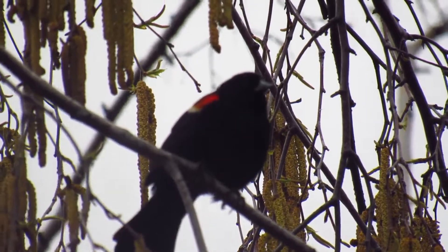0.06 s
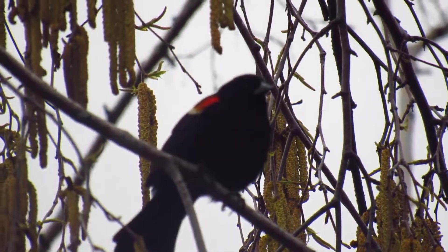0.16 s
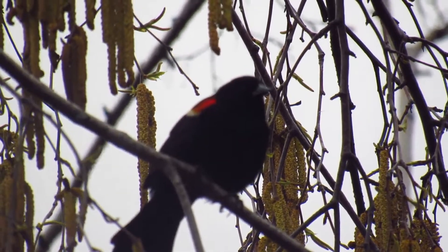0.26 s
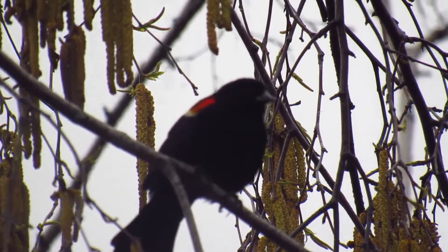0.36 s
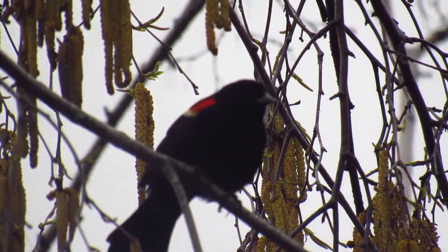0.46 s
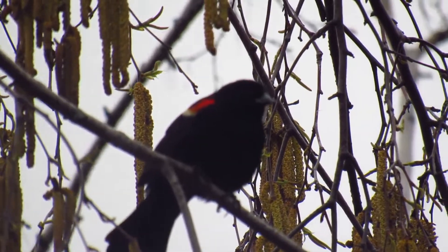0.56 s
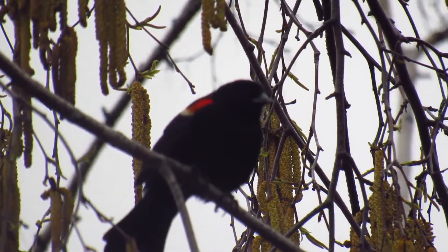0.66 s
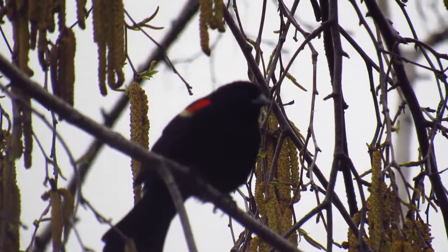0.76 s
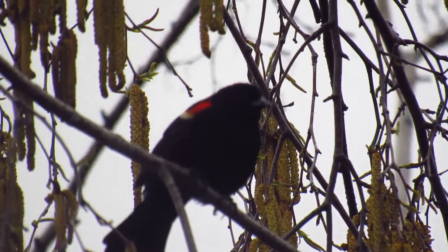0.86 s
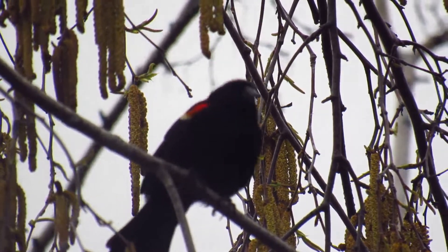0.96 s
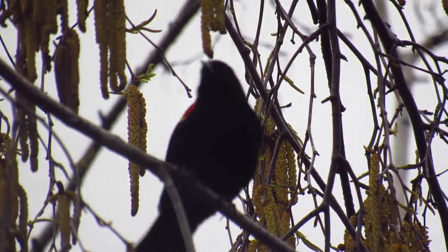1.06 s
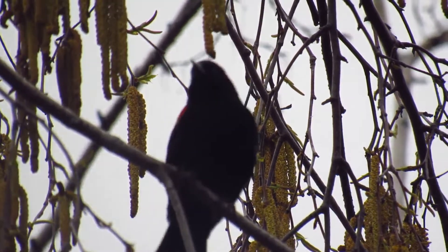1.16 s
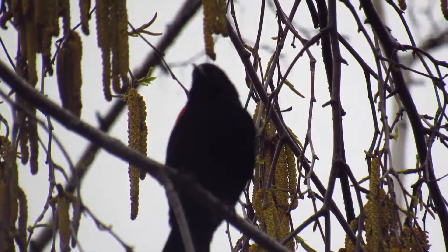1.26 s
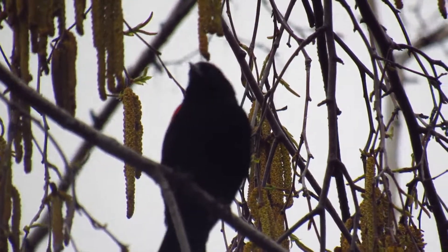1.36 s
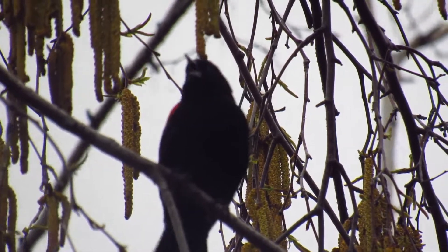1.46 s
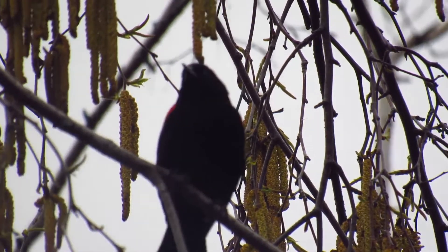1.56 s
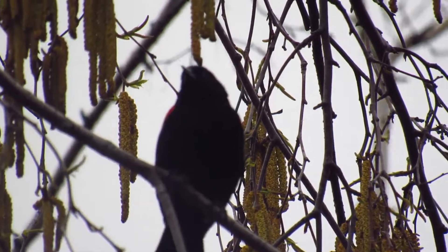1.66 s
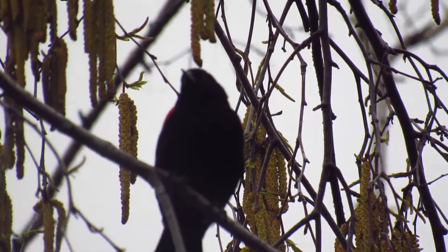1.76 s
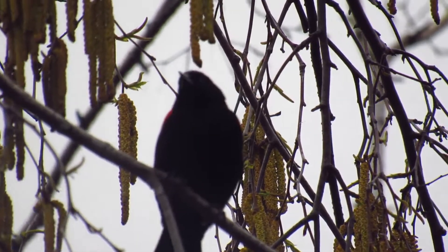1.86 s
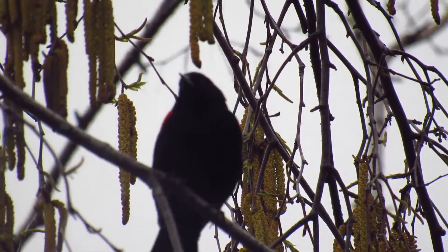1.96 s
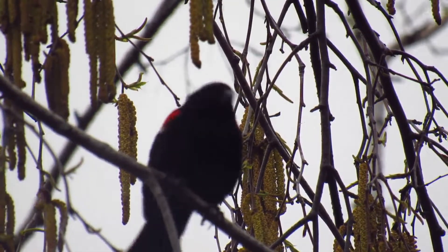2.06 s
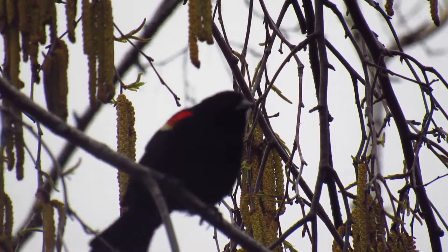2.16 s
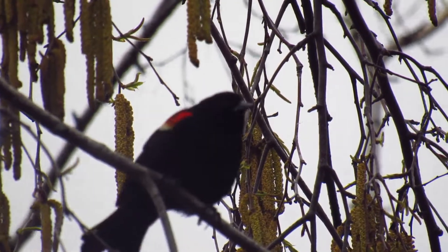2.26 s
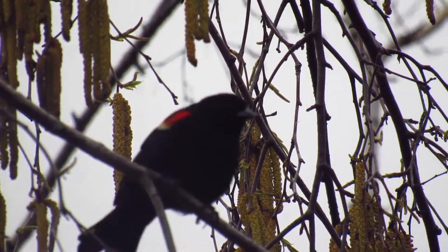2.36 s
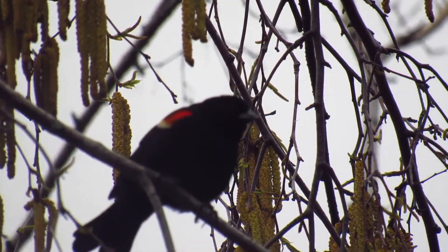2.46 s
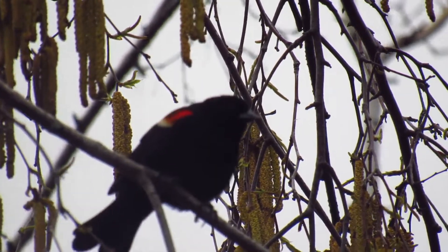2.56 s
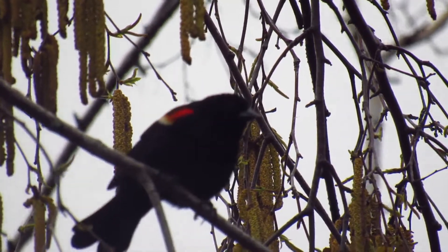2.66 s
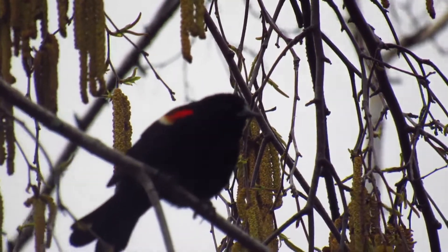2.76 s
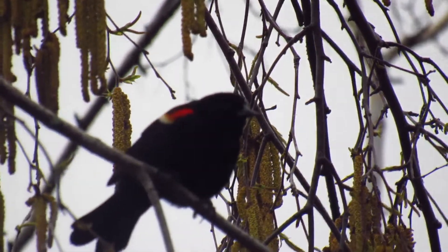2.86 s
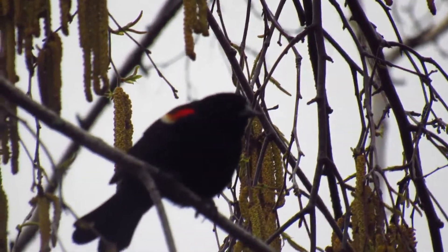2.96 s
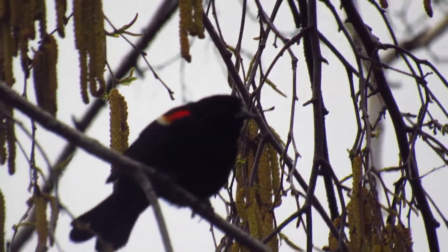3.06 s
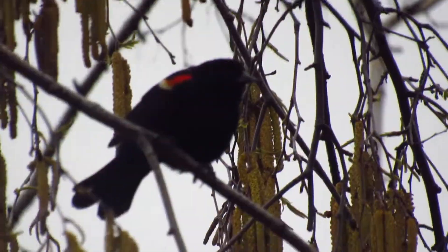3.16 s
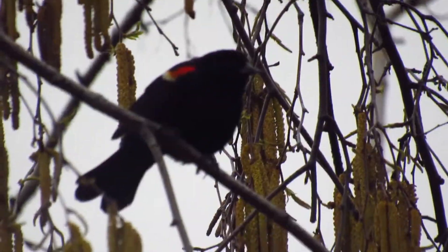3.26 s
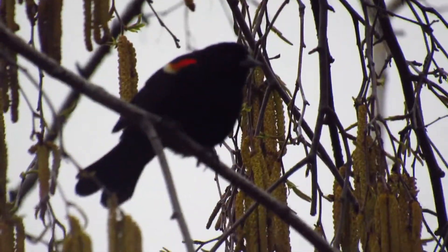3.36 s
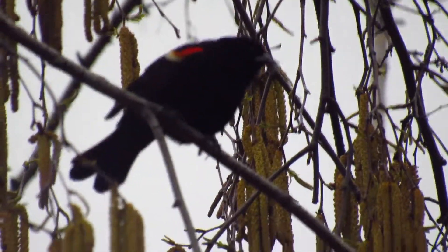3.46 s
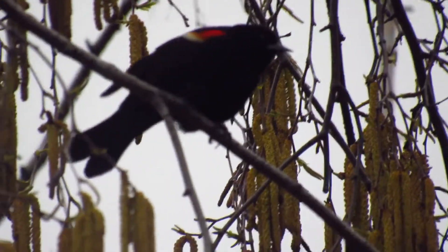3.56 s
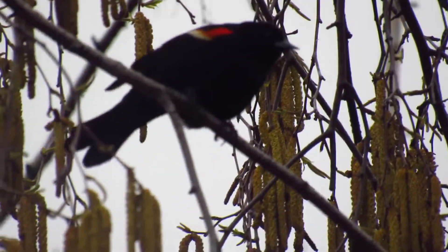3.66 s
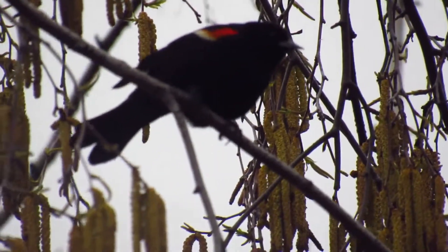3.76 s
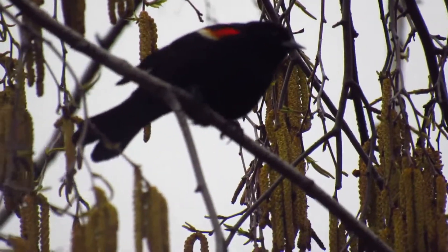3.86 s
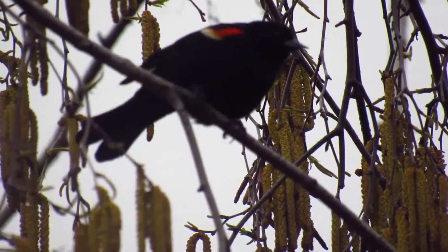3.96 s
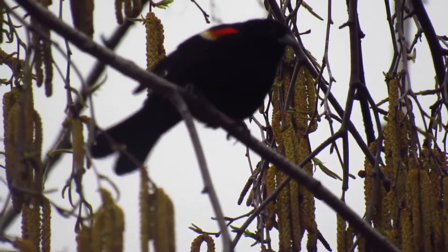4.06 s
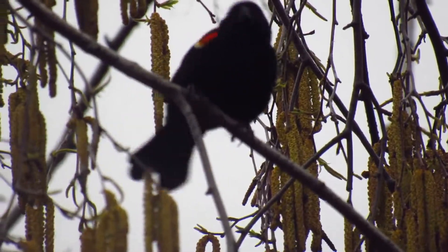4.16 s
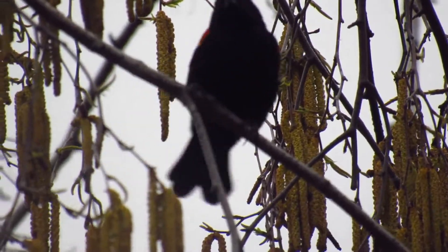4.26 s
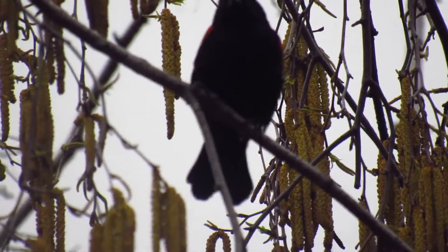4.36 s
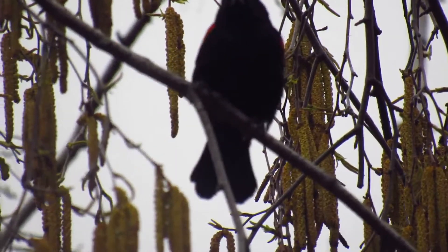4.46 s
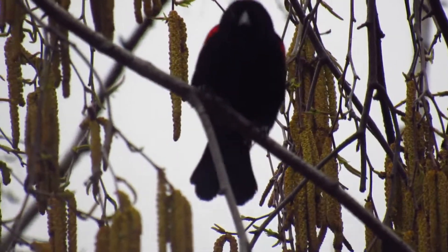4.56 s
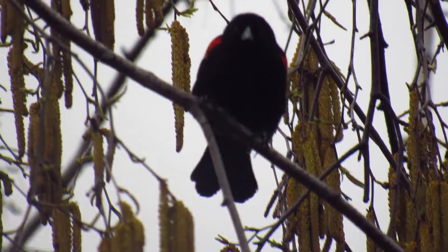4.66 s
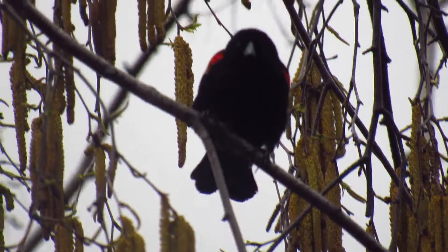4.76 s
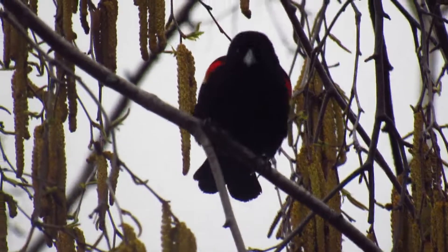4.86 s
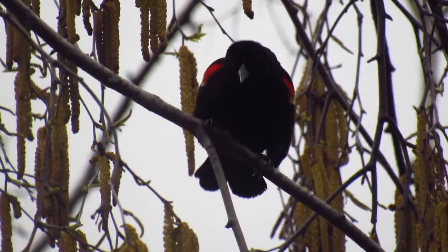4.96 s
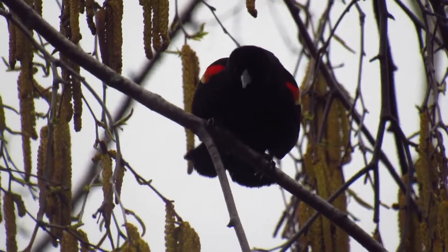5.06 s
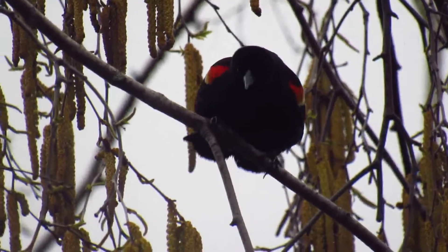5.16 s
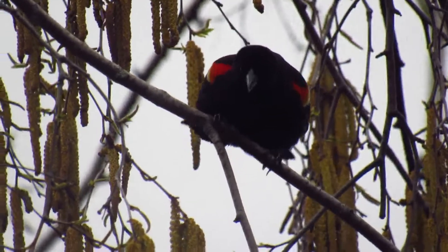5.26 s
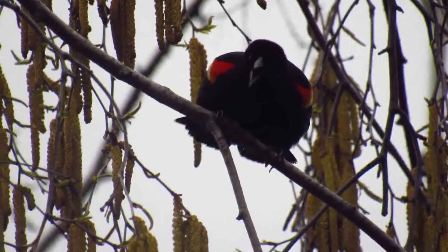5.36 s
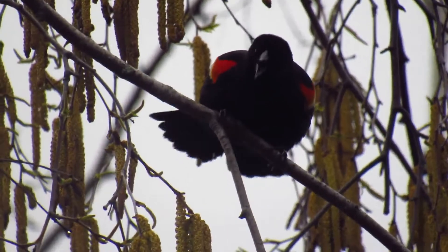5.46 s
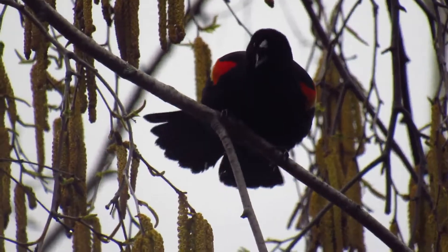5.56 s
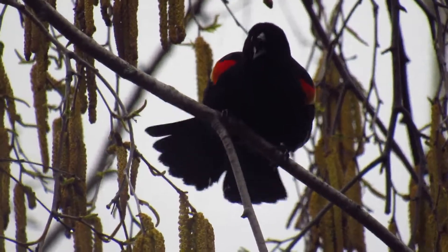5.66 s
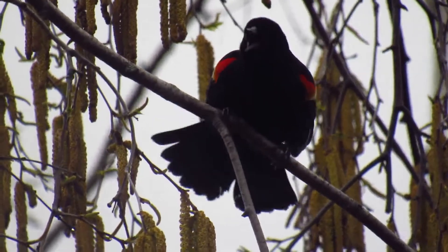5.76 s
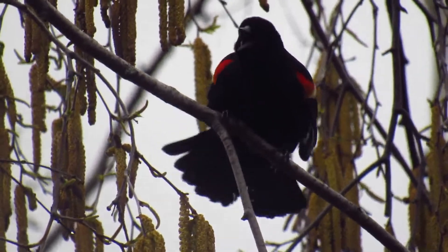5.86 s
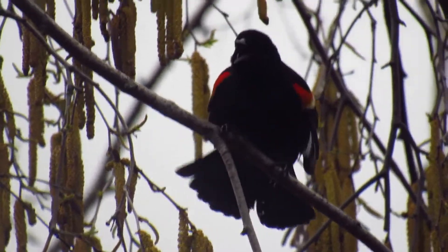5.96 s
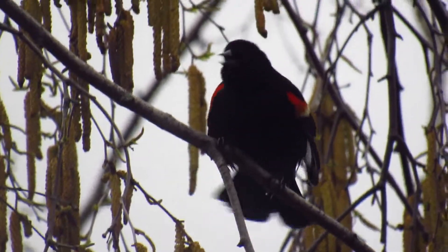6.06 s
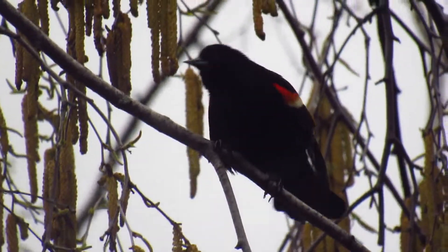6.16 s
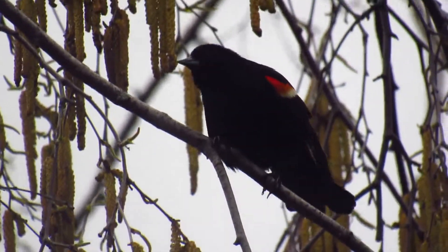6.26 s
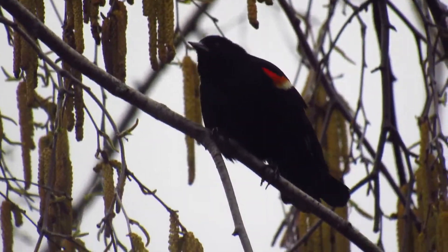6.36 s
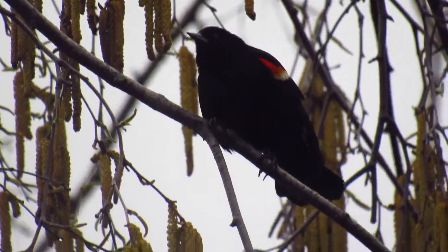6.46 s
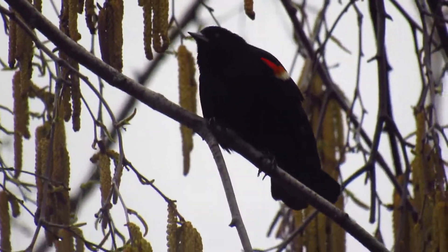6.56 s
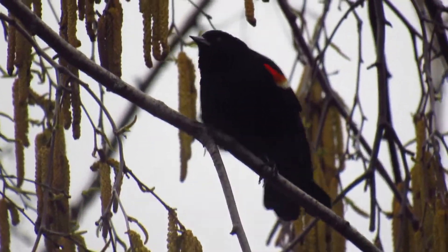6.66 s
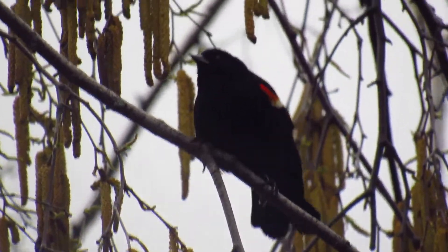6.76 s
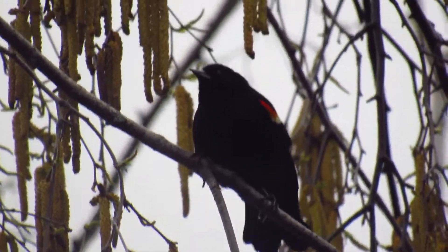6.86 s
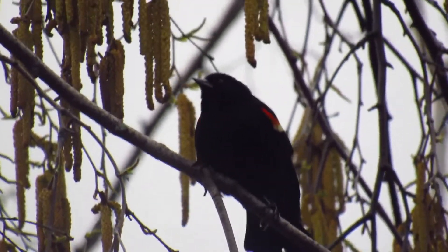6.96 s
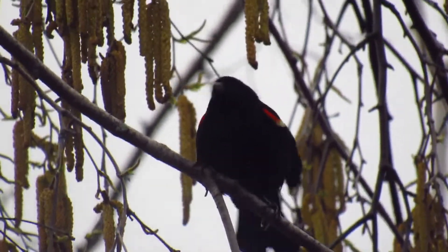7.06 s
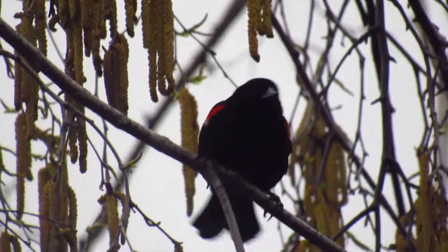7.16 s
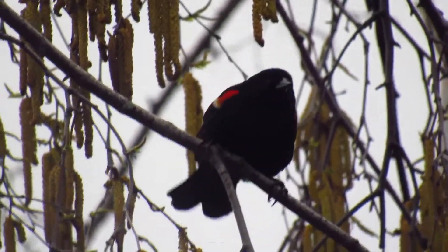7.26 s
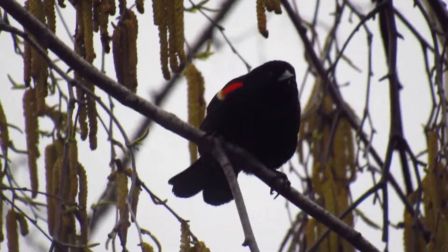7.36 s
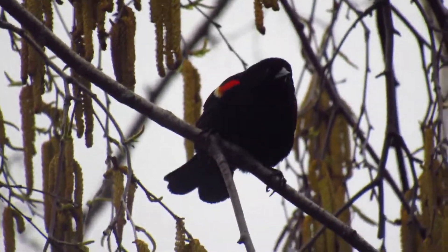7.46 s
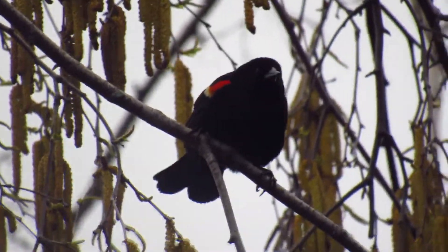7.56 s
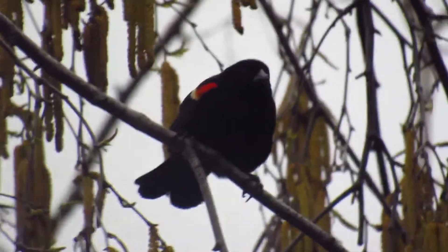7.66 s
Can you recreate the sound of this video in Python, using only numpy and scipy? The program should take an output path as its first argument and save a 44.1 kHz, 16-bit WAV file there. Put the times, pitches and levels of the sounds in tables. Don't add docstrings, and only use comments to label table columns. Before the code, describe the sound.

A wooded park with a low, dull wash of far traffic throughout. Faint small-bird peeps dot the first second, with a tiny microphone tick near 1.0. At 1.6 a near, dry, harsh chuck snaps out, followed by faint falling chirps. From 2.6 a rival blackbird farther off gives short whistles and a gurgle, then a rough buzzing trill from 2.9 to 3.6, echoing among trunks. Wind gusts begin thumping the microphone around 2.8, while a heavy vehicle's deep rumble and hollow roar swell, strongest about 4.5 to 6.2, with a big wind thump at 4.85. At 5.15 the near blackbird sings a clear low whistle, a quick liquid gurgle from 5.4, and a fast, bright buzzy trill from 5.65 to 6.2. Four echoing, softer chucks follow between 6.3 and 6.8. Sharp descending chirps come from 7.1, a tick at 7.55, as wind and rumble ease; it stops abruptly at 7.7.

```python
import sys
import numpy as np
from scipy import signal
from scipy.fft import rfft, irfft, next_fast_len
from scipy.io import wavfile
from scipy.ndimage import uniform_filter1d

SR = 44100
rng = np.random.default_rng(int(sys.argv[2]) if len(sys.argv) > 2 else 0)


def how_loud(loudness_db):
    steps = np.asarray(loudness_db, float) / 20
    return 10 ** steps


def store_wav(level_fs):
    pcm = np.round(np.clip(np.atleast_2d(level_fs), -1, 1) * 32767)
    wavfile.write(sys.argv[1], SR, pcm.T.astype(np.int16))


N = 340011
END_S = 7.704

# frequency in Hz, likeness from 0 to 1.
LIKENESS = [(60, 0.68), (250, 0.85), (700, 0.77), (1400, 0.83), (3100, 0.71), (6800, 0.11), (15000, .05)]
# frequency in Hz, density in dB per Hz.
TRAFFIC = [(220, -24), (380, 1), (430, -1), (451, -11.5), (569, -6), (664, -16.5), (892, -3.5),
           (1420, -11.5), (2230, -26), (3040, -29.5), (3550, -34.5), (4340, -36), (5070, -37.5),
           (13100, -40.5), (15500, -45)]
WASH_DB = -44.5
# frequency in Hz, density in dB per Hz.
RUMBLE = [(13, -62), (22, -21.5), (65, 2), (114, 1.5), (141, -0.5), (170, -4), (220, -35), (370, -120)]
RUMBLE_DB, NEAREST_S, PASS_S = -34, 4.9, 2.68
# frequency in Hz, density in dB per Hz.
DRONE = [(65, -39), (110, -14), (140, -19), (178, 0.5), (258, -4), (319, -0.5), (381, -29), (400, -35),
         (520, -15), (880, -120)]
# frequency in Hz, density in dB per Hz.
GROWL = [(210, -3), (360, 4), (387, -13), (414, -10.5), (455, 0), (499, -9.5), (543, -7), (700, -26),
         (910, -67), (1540, -120)]
# frequency in Hz, level in dB against the growl.
WHINE = [(421, -7), (490, -7.5), (615, -15)]
# time in seconds, drone level in dB, centre of the moving band in Hz.
VEHICLE = [(0, -35, 230), (.17, -41.5, 204.9), (.92, -37, 237.4), (2.0, -34.5, 210), (2.77, -39, 211.9),
           (3.31, -31.5, 235.9), (3.6, -33, 204.9), (4.16, -30, 214.4), (4.47, -26, 245), (4.9, -29, 206.9),
           (5.3, -24, 245.3), (6.1, -25, 250.8), (6.68, -39, 205.6), (7.19, -32, 268.7), (7.41, -37, 219),
           (7.71, -30.5, 199.4)]
GROWL_DB, GROWL_FOLLOWS, GROWL_WAKES_DB = -46.5, 2.18, -29.5
# peak time in seconds, width in seconds, peak level in dB.
GUSTS = [(1.65, .14, -48), (2.81, 0.072, -30), (2.92, .04, -29), (3.14, .15, -41), (3.34, .04, -25),
         (3.46, 0.29, -25.5), (3.9, 0.15, -22), (4.01, 0.034, -21), (4.17, 0.28, -24), (4.4, .11, -26),
         (4.52, .14, -24), (4.85, 0.26, -21), (4.85, .06, -10.5), (5.12, 0.073, -31), (5.6, .2, -44),
         (5.76, .06, -26), (6.09, .16, -24), (6.25, 0.079, -23), (6.42, .27, -17.5), (6.62, 0.11, -21.5),
         (6.9, 0.099, -21), (7.12, 0.15, -21), (7.38, 0.061, -30), (7.53, .15, -34)]
# frequency in Hz, density in dB per Hz.
GUST = [(12, -38), (20, -5), (65, 10.5), (96, 9.5), (177, -8), (229, -15.5), (264, -26), (330, -35),
        (430, -32), (730, -120)]
# start in seconds, peak level in dB.
TICKS = [
    (0.9719, -42),
    (7.5642, -32),
    (7.7, -46),
]
# start in seconds, level in dB rms, frequency in Hz.
TWITTER = [
    (3.42, -66.5, 9900),
    (3.58, -70, 9600),
    (3.7, -70, 9800),
    (3.8, -69, 10000),
    (3.92, -68, 9860),
    (4.05, -65, 9640),
    (4.17, -65, 8760),
]
TWITTER_S = 0.086
# start in seconds, length in seconds, starting pitch in Hz, level in dB rms.
FALLS = [(1.794, .03, 4950, -66), (1.934, .035, 4900, -65), (1.966, .025, 3300, -65),
         (3.605, 0.025, 3600, -63), (3.821, .045, 4850, -64), (3.879, 0.042, 3350, -64),
         (7.113, .032, 3780, -61), (7.271, 0.052, 5134, -54.5), (7.289, 0.027, 3780, -54),
         (7.397, 0.055, 4750, -55), (7.417, .025, 3460, -56), (7.523, .052, 4730, -55.5),
         (7.545, 0.041, 3600, -57), (7.673, 0.026, 4970, -69)]
FALL_HZ_PER_S, BOW_HZ_PER_S = 36000, 5470
# start in seconds, length in seconds, top pitch in Hz, level in dB rms.
ARCHES = [
    (2.298, 0.073, 3120, -63.5),
    (4.248, .082, 3150, -63),
    (4.372, .074, 3150, -62),
]
ARCH_FOOT = .89
# start in seconds, length in
# seconds, pitch in Hz, slide in Hz, level in dB rms.
PEEPS = [(.15, .031, 4500, 180, -67), (.155, .042, 8400, -100, -65), (.303, .035, 2540, -180, -65),
         (.335, .045, 2700, 500, -65), (.376, .02, 2930, -80, -64), (4.295, .035, 2420, 0, -63),
         (0.43, 0.025, 2580, -60, -67), (.462, .065, 2650, 250, -68), (0.638, .06, 4250, -80, -64),
         (.7, .03, 4080, -150, -70), (.505, .03, 4300, -400, -69), (.772, .028, 4850, 0, -71),
         (1.035, 0.033, 4750, 0, -72), (1.5, .04, 5900, 0, -75), (1.582, .021, 3400, 1600, -62),
         (1.601, 0.025, 4200, -120, -58), (.31, .032, 4800, 70, -65), (5.035, .07, 5200, 1500, -74),
         (5.07, .02, 3800, 0, -65), (4.965, .05, 4200, -1600, -75), (3.162, 0.061, 2360, -20, -56),
         (3.62, .22, 2400, -71, -65), (3.86, .046, 3700, 146, -66), (4.888, 0.053, 3170, 302, -62.5),
         (7.08, .024, 4450, 300, -67), (7.142, .048, 4080, -320, -57), (7.13, 0.035, 8350, -700, -65),
         (7.17, .025, 7900, -100, -66), (7.135, .03, 5500, 2500, -69), (7.2, 0.041, 4560, 470, -65),
         (7.199, .016, 2500, -50, -64), (7.199, .016, 3050, 0, -63), (7.387, 0.066, 2450, -150, -64),
         (7.563, 0.0065, 2220, -100, -49), (6.955, .03, 4650, 700, -69)]
# start in seconds, length in seconds, level in dB rms, throat pitch in Hz, echo in dB.
CHUCKS = [
    (1.623, 0.048, -39, 3700, -9.5),
    (4.735, .13, -68, 3980, 2),
    (6.292, .06, -53, 4200, 2.5),
    (6.433, 0.057, -53, 4523, 2.5),
    (6.6, 0.072, -52, 4400, -0.5),
    (6.782, 0.049, -56.5, 3927, 6),
]
# frequency in Hz, density in dB per Hz.
CHUCK = [(1060, -33), (1800, -18), (2740, -15), (2960, -15), (3900, -7.5), (5640, -26), (6750, -25.5),
         (9270, -26), (10500, -20), (14000, -48)]
# start and length in seconds, first and last pitch in Hz, peak in dB rms.
CHUCK_TONE = [
    (1.622, .04, 2810, 4400, -33),
    (1.655, .028, 4000, 3640, -55),
]
# multiple of the pitch, level in dB.
OVERTONES = [(2, -41), (3, -41), (4, -39), (5, -42.5)]
BEAK_HZ, BEAK_DB, BEAK_WIDTH = 6350, 15, .1
LATE_BELOW_HZ, LATE_SPAN_HZ = 4200, 993
# start and length in seconds, first and last pitch in Hz, peak in dB rms.
RIVAL_WHISTLES = [
    (2.565, 0.036, 1494, 1530, -48),
    (2.665, .04, 3930, 2150, -57.5),
    (2.66, .07, 5200, 5200, -66),
    (2.72, 0.08, 2500, 2450, -64),
    (2.8, 0.036, 2350, 2170, -44.5),
    (2.83, 0.041, 2145, 2170, -39),
]
RIVAL_GURGLES = [
    (2.695, 0.023, 2650, 2750, -42),
    (2.7, 0.055, 2950, 2950, -55),
    (2.83, .06, 2480, 2650, -48),
]
# time in seconds, buzz cycles per second, level in dB.
FAR_TRILL = [
    (2.872, 58.85, -42),
    (2.9, 58.4, -49),
    (3.529, 58.2, -51),
    (3.58, 57.6, -78),
]
# pitch in Hz, fall per cycle in Hz, wander in Hz, level in dB, accent in dB.
FAR_VOICES = [(2740, 220, 60, 1, 7.9), (3350, 270, 131, 0, 3.1), (3910, 400, 110, 1, 4.7),
              (4520, 300, 152, -3.5, 3), (5260, 410, 150, -1.5, 4.4), (5600, 300, 197, -12.5, 3),
              (3050, 270, 118, -4, 3), (6900, 300, 450, -17, 3)]
# start and length in seconds, first and last pitch in Hz, peak in dB rms.
WHISTLES = [(5.15, 0.17, 1311, 1313, -33.5), (5.3, .04, 1249, 1270, -44.5), (5.34, .11, 2070, 2008, -45),
            (5.377, 0.056, 2027, 2014, -26.5), (5.33, .05, 6280, 6150, -62), (5.37, .045, 6110, 6057, -59),
            (5.41, .05, 5900, 5780, -62), (5.485, 0.11, 1740, 1710, -44), (5.582, .023, 6020, 6020, -51),
            (5.611, 0.02, 3380, 3540, -31), (5.624, .006, 5400, 3460, -29), (5.626, 0.023, 5120, 5220, -34)]
GURGLES = [(5.42, 0.045, 1415, 1680, -35), (5.437, 0.027, 2450, 2540, -30),
           (5.445, .028, 2260, 2270, -32.5), (5.452, .05, 5800, 6060, -43), (5.4, .06, 6600, 6600, -53),
           (5.476, .036, 6780, 6850, -47), (5.468, .036, 5040, 5130, -38), (5.545, 0.045, 3430, 3440, -39),
           (5.572, 0.016, 2450, 2410, -28), (5.633, .016, 3413, 3500, -27.5),
           (5.645, .015, 3830, 4330, -40), (5.648, .022, 2750, 2850, -29), (5.555, .06, 1240, 1240, -46)]
# start in seconds, length in seconds.
HIGH_CHORD = (5.496, 0.075)
LOW_CHORD = (5.583, 0.042)
# frequency in Hz, peak level in dB rms.
HIGH_PARTIALS = [(2860, -37), (3465, -28), (4240, -36), (5060, -33.5)]
LOW_PARTIALS = [(1610, -36), (2005, -34), (2500, -34), (3410, -50)]
# peak time in seconds, peak level in dB.
PUFFS = [
    (5.235, -59),
    (5.4, -56),
    (5.455, -51.5),
    (5.502, -44.5),
    (5.612, -48),
]
PUFF_DB_PER_S, LEAK_DB, LEAK_DB_PER_S = 420, -57.5, 16
# frequency in Hz, density in dB per Hz.
RASP_COLOUR = [(3710, -18), (6300, -10), (6940, -5), (7120, -14), (7760, -10.5), (9200, -12.5),
               (11800, -6.5), (12800, -20), (14900, -10)]
# time in seconds, buzz cycles per second, level in dB.
NEAR_TRILL = [
    (5.645, 102, -37),
    (5.66, 100, -32.5),
    (5.9, 100.5, -33),
    (6.201, 95, -35),
    (6.235, 76, -50),
]
# pitch in Hz, fall per cycle in Hz, wander in Hz, level in dB, accent in dB.
NEAR_VOICES = [(2892, -3, 11, -4, 7.5), (2810, 104, 58, 1.5, -7.5), (3600, 292, 99, -11.5, 3.5),
               (4400, 600, 230, -15, 5.5), (5830, 0, 22, -17, 7.5), (5620, 1098, 45, -8, 6.5),
               (6850, 100, 110, -26, 1), (5400, 200, 90, -12.5, 3), (3120, 60, 54, -11, -3),
               (7670, 300, 420, -26.5, -3), (8370, 500, 183, -26, 4), (9250, 300, 360, -27.5, 5.5),
               (9740, 500, 370, -28, -3)]


def rms_one(x):
    return x / np.sqrt(np.mean(x ** 2) + 1e-20)


def in_time(rows, t):
    s, *columns = np.transpose(rows)
    return [np.interp(t, s, c) for c in columns]


def at_hz(points, hz):
    point_hz, values = np.array(points).T
    return np.interp(np.log(hz + 1), np.log(point_hz), values)


def coloured(x, spectrum):
    size = next_fast_len(x.shape[-1])
    hz = np.arange(size // 2 + 1) * SR / size
    return irfft(rfft(x, size) * how_loud(at_hz(spectrum, hz)), size)[..., :x.shape[-1]]


def tone(hz):
    return np.sin(2 * np.pi * np.cumsum(hz) / SR)


def drift(rate, size=N):
    r = np.exp(-2 * np.pi * rate / SR)
    noise = rng.standard_normal(size + 20000)
    return rms_one(signal.lfilter([1], [1, -2 * r, r * r], noise)[20000:])


def swell(size, rise, point=1.0):
    u, rise = np.arange(size) / size, np.clip(rise, .05, .9)
    return np.sin(np.pi / 2 * np.minimum(u / rise, (1 - u) / (1 - rise))) ** point


def add(out, s, sound):
    i = round(s * SR)
    out[i:i + len(sound)] += sound[:N - i]


def woods(x, t60, gap_s):
    t = np.arange(round(.7 * SR)) / SR
    shared, left, right = rng.standard_normal((3, len(t)))
    tail = (shared + 0.46 * np.array([left, right])) * how_loud(-60 * t / t60) * (t > gap_s)
    tail = signal.lfilter([1], [1, -.4], tail)
    tail = tail / np.sqrt(np.sum(tail ** 2) / 2)
    return signal.fftconvolve(x[None], tail, axes=1)[:, :N]


def stereo_noise(spectrum):
    mid, side = coloured(rng.standard_normal((2, N)), spectrum)
    side_db = [(hz, 10 * np.log10((1.001 - min(c, 1)) / (1 + c))) for hz, c in LIKENESS]
    side = coloured(side, side_db)
    return (mid + side * [[1], [-1]]) / np.std(mid)


def traffic(t):
    whistle = how_loud(-19.5 + 5.7 * drift(3.4)) * np.sin(2 * np.pi * 1393 * t)
    return how_loud(WASH_DB) * (stereo_noise(TRAFFIC) + whistle)


def rumble(t):
    db = RUMBLE_DB - 10 * np.log10(1 + ((t - NEAREST_S) / PASS_S) ** 2)
    return how_loud(db + 0.5) * stereo_noise(RUMBLE)


def vehicle(t):
    drone_db, centre_hz = in_time(VEHICLE, t)
    growl_db = GROWL_DB + GROWL_FOLLOWS * np.maximum(drone_db - GROWL_WAKES_DB, 0)
    turn = 2 * np.pi * np.cumsum(centre_hz) / SR
    moving_band = (drift(59.7) * np.sin(turn) + drift(46.0) * np.cos(turn)) * how_loud(-3.0)
    tones = sum(how_loud(db + 3.25 * drift(2.7)) * tone(hz + 1.572 * drift(3.21)) for hz, db in WHINE)
    roar = how_loud(drone_db) * (how_loud(-4) * stereo_noise(DRONE) + moving_band)
    growl = how_loud(growl_db - 0.5) * stereo_noise(GROWL)
    return roar + growl + how_loud(uniform_filter1d(growl_db, size=20000)) * tones


def wind(t):
    db = np.full(N, -60.)
    for s, width, peak_db in GUSTS:
        db = np.maximum(db, peak_db + 1.5 - 30 * np.abs(t - s) / width)
    db = uniform_filter1d(db, size=500)
    air = rms_one(coloured(rng.standard_normal(N), GUST))
    air = air / np.sqrt(uniform_filter1d(air ** 2, size=2500) + .1)
    bright = signal.sosfilt(signal.butter(2, 130, "high", fs=SR, output="sos"), air)
    brighter = how_loud(0.33 * (db + 37)) - 1
    return how_loud(db + 1.0) * (air + brighter * bright) * [[1.06], [-.94]]


def ticks():
    out, t = np.zeros((2, N)), np.arange(300) / SR
    for s, db in TICKS:
        snap = rng.standard_normal(300) * how_loud(db - 0.5 - 60 * t / 0.01)
        add(out[0], s, snap)
        add(out[1], s, 0.62 * snap)
    return signal.sosfilt(signal.butter(2, [4500, 15000], "band", fs=SR, output="sos"), out)


def twitter():
    out = np.zeros(N)
    for s, db, hz in TWITTER:
        size = round(TWITTER_S * SR)
        tremble = hz + 450 * drift(404, size)
        add(out, s, how_loud(db) * swell(size, rise=.4) * tone(tremble))
    return out


def chirps():
    rows = []
    for s, length, hz, db in FALLS:
        middle_hz = hz - (FALL_HZ_PER_S / 2 - BOW_HZ_PER_S) * length
        rows.append((s, length, middle_hz, -FALL_HZ_PER_S * length, BOW_HZ_PER_S * length, db))
    rows += [(s, length, hz, 0, hz * (1 - ARCH_FOOT), db) for s, length, hz, db in ARCHES]
    rows += [(s, length, hz, slide_hz, 0, db) for s, length, hz, slide_hz, db in PEEPS]
    out = np.zeros(N)
    for s, length, middle_hz, slide_hz, bow_hz, db in rows:
        u = np.linspace(-1, 1, round(length * SR))
        hz = middle_hz + slide_hz / 2 * u - bow_hz * u ** 2
        level = np.sqrt(2) * how_loud(db + 3.2 * drift(97, len(u)))
        add(out, s, level * swell(len(u), rise=0.35, point=0.3) * tone(hz))
    return out


def chucks():
    direct, feed = np.zeros(N), np.zeros(N)
    for s, length, db, throat_hz, echo_db in CHUCKS:
        size = round(length * SR)
        slaps = rng.standard_normal(size) * how_loud(2.2 * drift(500, size))
        air_db = 0.07 * (echo_db + 12.5)
        throat = [(hz * throat_hz / 3700, d - hz / 1000 * air_db) for hz, d in CHUCK]
        call = how_loud(db) * swell(size, rise=0.3, point=1.7) * rms_one(coloured(slaps, throat))
        add(direct, s, call)
        add(feed, s, how_loud(echo_db) * call)
    return direct + notes(CHUCK_TONE, throb=0.8, throb_hz=210, wobble_hz=334), feed


def notes(rows, throb, throb_hz, wobble_hz):
    out = np.zeros(N)
    for s, length, from_hz, to_hz, db in rows:
        size = round(length * SR)
        hz = np.linspace(from_hz, to_hz, size) + wobble_hz * throb * drift(195, size)
        phase, effort = 2 * np.pi * np.cumsum(hz) / SR, swell(size, rise=.5, point=1.3)
        upper = np.zeros(size)
        for k, overtone_db in OVERTONES:
            if k * from_hz < .3 * SR:
                beak_db = BEAK_DB * np.exp(-(np.log(k * hz / BEAK_HZ) / BEAK_WIDTH) ** 2)
                upper += how_loud(overtone_db + beak_db + 2 * drift(61, size)) * np.sin(k * phase)
        turn = np.pi * throb_hz * np.arange(size) / SR
        beat = 1 - np.clip(throb, 0, 1) * (0.49 * np.sin(turn) ** 2 + 0.7 * np.sin(2 * turn) ** 2)
        add(out, s, np.sqrt(2) * how_loud(db) * effort * beat * (np.sin(phase) + effort * upper))
    return out


def trill(rows, voices, count, depth, rough_db, late_s, glide, low_glide, bend, tire_db):
    start, end = rows[0][0], rows[-1][0]
    size = round((end - start) * SR)
    t = np.arange(size) / SR
    rate, db = in_time(rows, start + t)
    cycle = np.cumsum(rate * (1 + 0.0016 * drift(33, size))) / SR
    pulses = 1 - np.clip(depth, 0, 1) * np.cos(np.pi * count * cycle) ** 2
    late = np.cos(np.pi * (cycle - 1 + .5 / count)) ** 10
    buzz = 0
    for hz, fall_hz, wander_hz, voice_db, accent_db in voices:
        low = np.clip((LATE_BELOW_HZ - hz) / LATE_SPAN_HZ, 0, 1)
        joined = np.clip((t - late_s * low) / 0.0089, 0, 1)
        hz = hz * (1 + (glide + low_glide * low) * (t / t[-1]) ** bend)
        wander = 1.588 * wander_hz * np.tanh(drift(251, size))
        slide = hz - fall_hz * ((cycle % 1) ** 3 - .25) + wander
        unsteady_db = rough_db * wander_hz / (wander_hz + 60) * drift(150, size)
        tired_db = tire_db * (low - .7) * t / t[-1]
        buzz = buzz + joined * how_loud(voice_db + tired_db + accent_db * late + unsteady_db) * tone(slide)
    out = np.zeros(N)
    stop = np.clip((t[-1] - t) / .005, 0, 1)
    add(out, start, how_loud(db) * stop * rms_one(buzz * pulses))
    return out


def rival_song():
    song = notes(RIVAL_WHISTLES, throb=0.12, throb_hz=129.95, wobble_hz=121)
    song = song + notes(RIVAL_GURGLES, throb=0.9, throb_hz=130, wobble_hz=121)
    buzz = trill(FAR_TRILL, FAR_VOICES, count=2, depth=.75, rough_db=1.8, late_s=.05,
                 glide=.005, low_glide=.075, bend=1.3, tire_db=4.5)
    return song + how_loud(-0.5) * buzz


def rasp():
    start, trill_s, end = WHISTLES[0][0], NEAR_TRILL[0][0], NEAR_TRILL[-1][0]
    t = np.arange(start, end, 1 / SR)
    db = np.where(t > trill_s, LEAK_DB - LEAK_DB_PER_S * (t - trill_s), -72.)
    for s, peak_db in PUFFS:
        db = np.maximum(db, peak_db - PUFF_DB_PER_S * np.abs(t - s))
    air = rms_one(coloured(rng.standard_normal(len(t)), RASP_COLOUR))
    out = np.zeros(N)
    add(out, start, how_loud(db + 7.5 + 2.0 * drift(84, len(t))) * air)
    return out


def singer():
    chords = [(*HIGH_CHORD, hz, hz, db) for hz, db in HIGH_PARTIALS]
    chords += [(*LOW_CHORD, hz, hz, db) for hz, db in LOW_PARTIALS]
    song = notes(WHISTLES, throb=.12, throb_hz=143, wobble_hz=110)
    song = song + notes(list(GURGLES) + chords, throb=.7, throb_hz=143, wobble_hz=105)
    buzz = trill(NEAR_TRILL, NEAR_VOICES, count=3, depth=.7, rough_db=2, late_s=.002,
                 glide=-.04, low_glide=-.005, bend=2.4, tire_db=3.5)
    return song + rasp() + buzz


def scene():
    t = np.arange(N) / SR
    low = traffic(t) + rumble(t) + vehicle(t)
    far = chirps() + twitter()
    direct, feed = chucks()
    rival, near = rival_song(), singer()
    near_left = signal.lfilter([.27, 1], [1, .27], near)
    early = how_loud(-12) * near + feed + how_loud(-9) * far + how_loud(-2.0) * rival
    late = how_loud(-12.0) * rival + how_loud(-11.5) * far + how_loud(-24.5) * near + how_loud(-9.0) * feed
    echoes = woods(early, t60=0.18, gap_s=.004) + woods(late, t60=2.5, gap_s=0.017)
    lean = how_loud([[.3], [-.3]])
    birds = np.array([near_left, near]) * lean + rival * how_loud([[-.5], [.5]]) + (far + direct) * lean
    return low * how_loud([[1.6], [-1.6]]) + wind(t) + birds + echoes + ticks()


def starved(x):
    edge_top_hz, edge_hz_per_db = 13450, 55
    need_hz_per_db, need_most_db, spread_db = 170, 3, 1.9
    hz, _, z = signal.stft(x, SR, nperseg=2048)
    band_hz = hz[4:1024:8, None]
    power = np.mean(np.abs(z[:, :1024]) ** 2, axis=0).reshape(128, 8, -1).mean(axis=1) + 1e-20
    band_db = 10 * np.log10(power)
    loud_db = uniform_filter1d(10 * np.log10(power.sum(axis=0)), size=15)
    song_db = uniform_filter1d(band_db[14:36].mean(axis=0), size=5)
    song_load_db = 1.2 * np.clip(song_db - np.median(song_db), 0, 12)
    load_db = loud_db - np.median(loud_db) + song_load_db
    edge_hz = edge_top_hz - edge_hz_per_db * load_db
    need_db = np.minimum((band_hz - edge_hz) / need_hz_per_db, need_most_db + .4 * load_db)
    luck_db = spread_db * rms_one(uniform_filter1d(rng.standard_normal(power.shape), size=3))
    stands_db = band_db - np.median(band_db, axis=1, keepdims=True) + luck_db
    keep = (stands_db > need_db) | (band_hz < edge_hz - 900)
    z[:, :1024] *= np.repeat(keep, 8, axis=0)
    return signal.istft(z, SR, nperseg=2048)[1][:, :N]


def top_cut(x):
    return signal.sosfilt(signal.butter(12, 16170, fs=SR, output="sos"), x)


def record(dry):
    low_pass = signal.ellip(10, .5, 70, 14950, fs=SR, output="sos")
    cut = signal.sosfilt(low_pass, starved(dry))
    finished = cut * np.clip((END_S - np.arange(N) / SR) / .003, 0, 1)
    return top_cut(finished)


dry = scene()
out = record(dry)
store_wav(out)
```